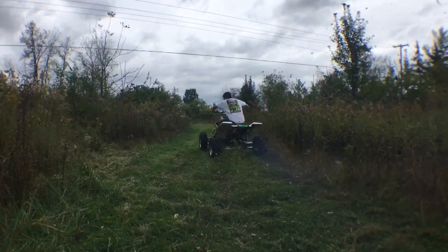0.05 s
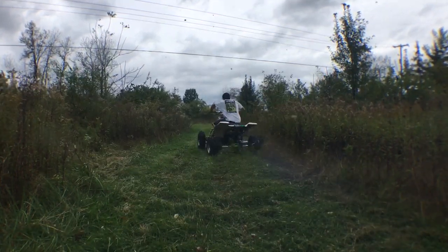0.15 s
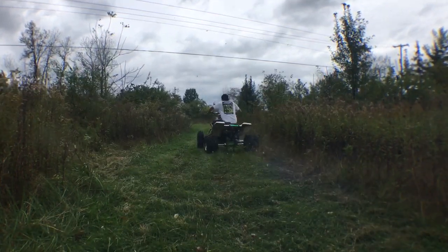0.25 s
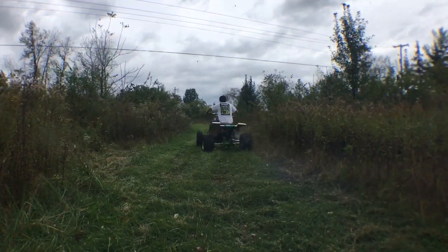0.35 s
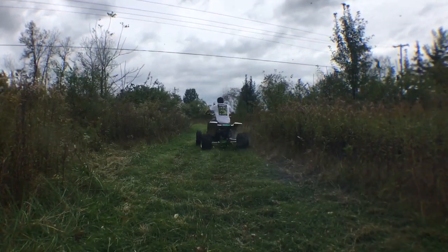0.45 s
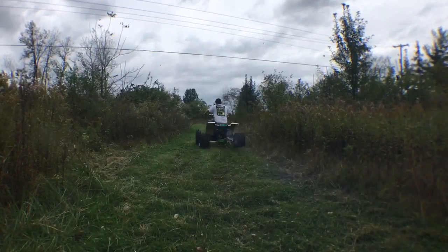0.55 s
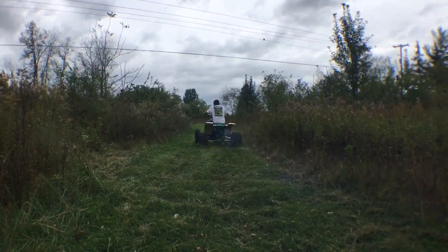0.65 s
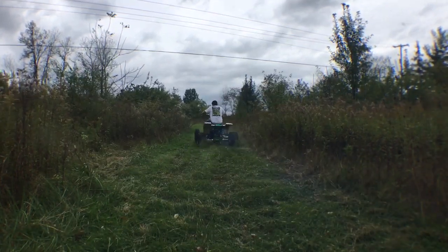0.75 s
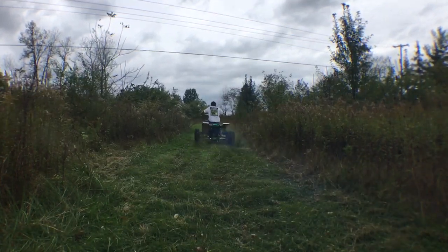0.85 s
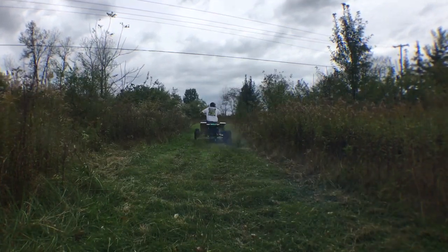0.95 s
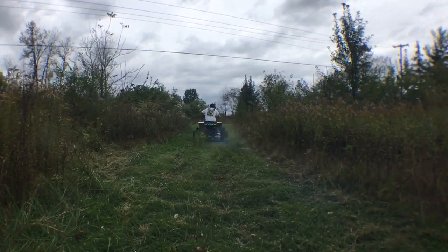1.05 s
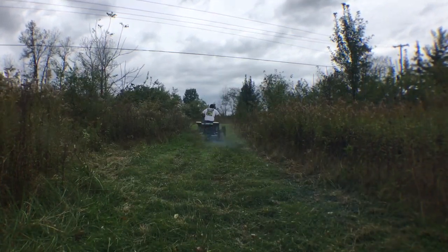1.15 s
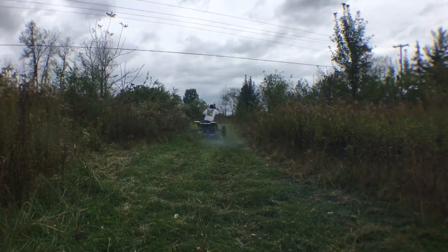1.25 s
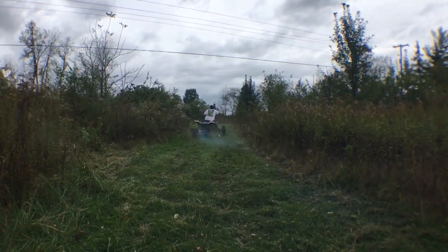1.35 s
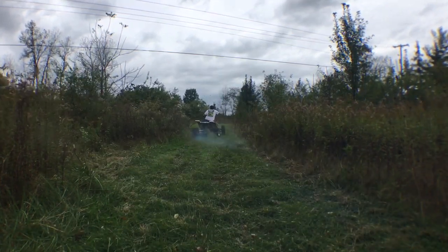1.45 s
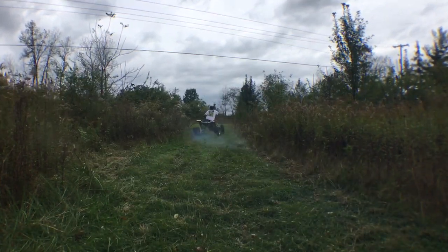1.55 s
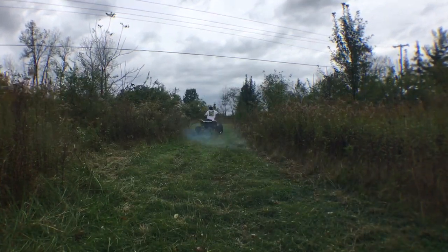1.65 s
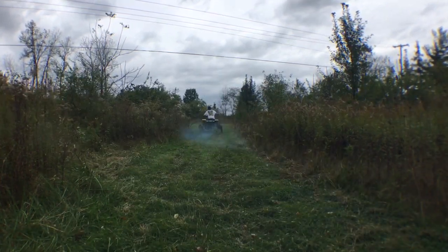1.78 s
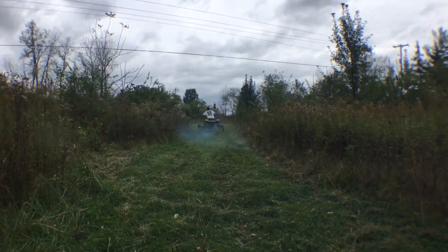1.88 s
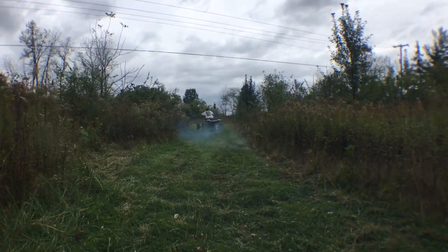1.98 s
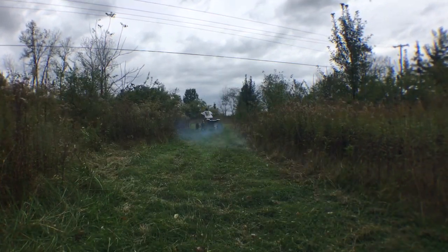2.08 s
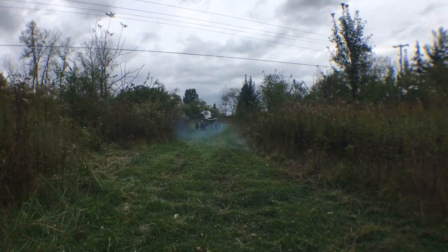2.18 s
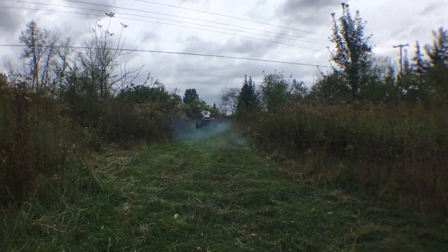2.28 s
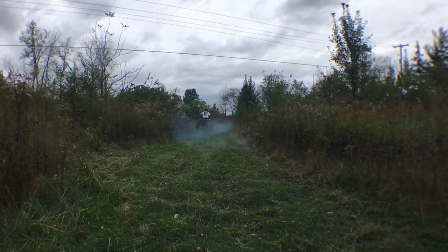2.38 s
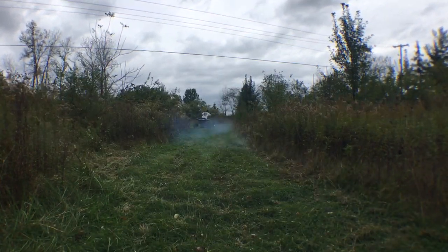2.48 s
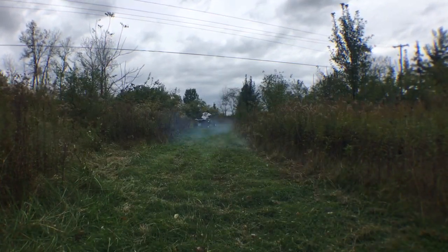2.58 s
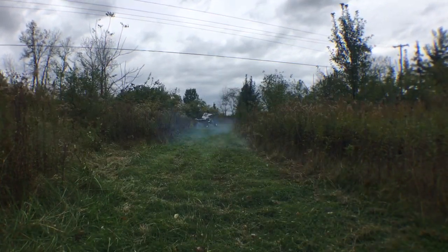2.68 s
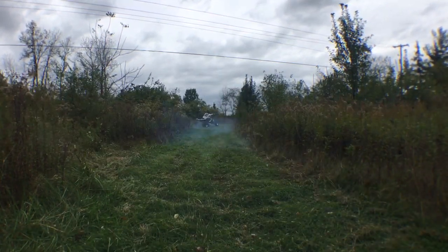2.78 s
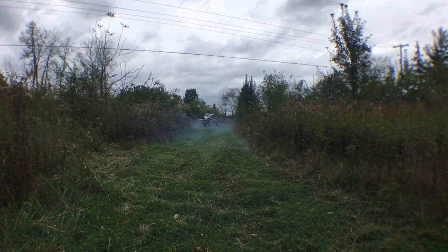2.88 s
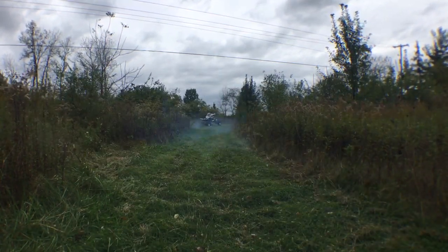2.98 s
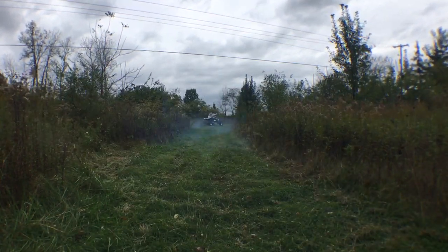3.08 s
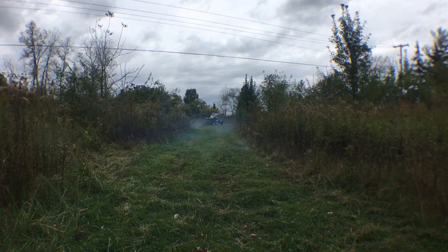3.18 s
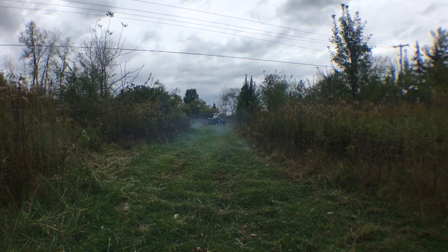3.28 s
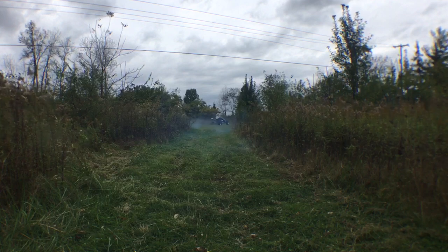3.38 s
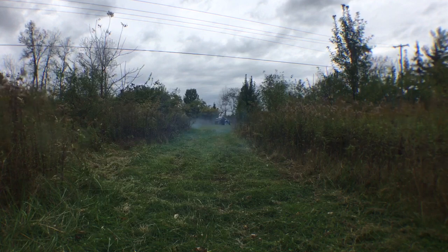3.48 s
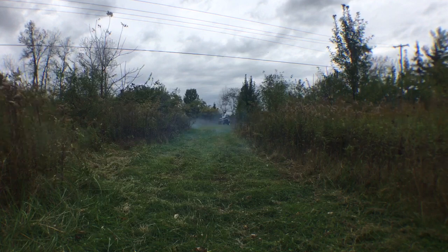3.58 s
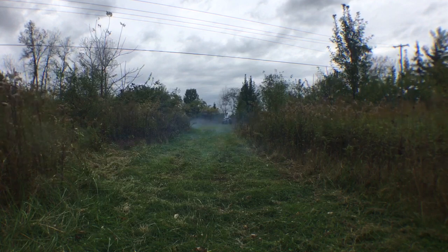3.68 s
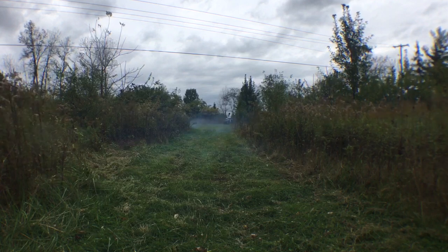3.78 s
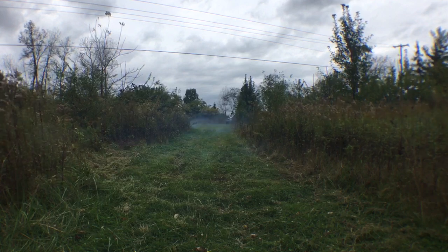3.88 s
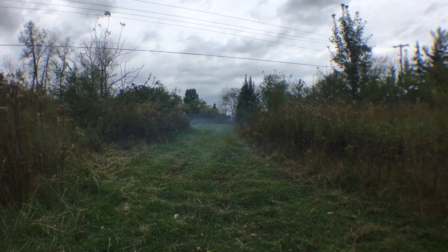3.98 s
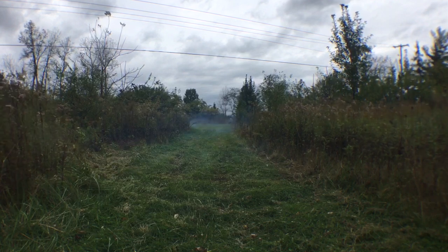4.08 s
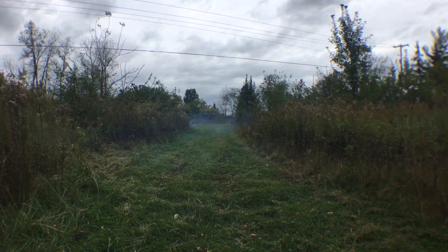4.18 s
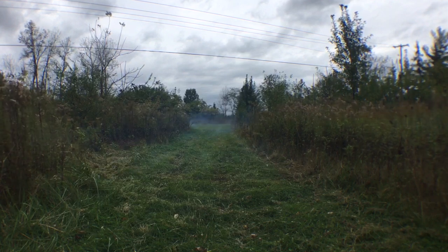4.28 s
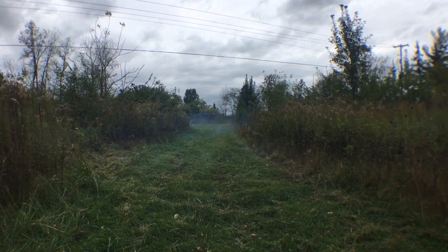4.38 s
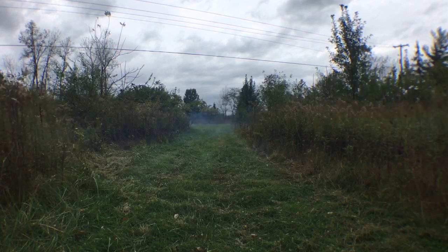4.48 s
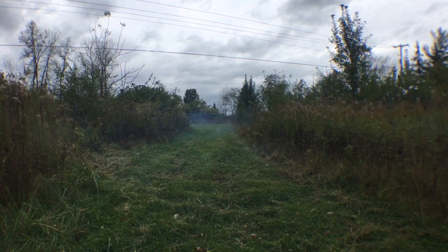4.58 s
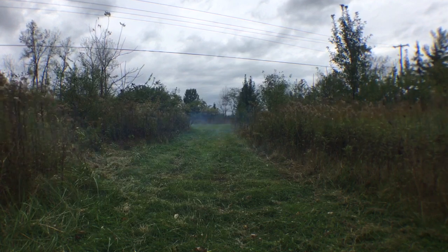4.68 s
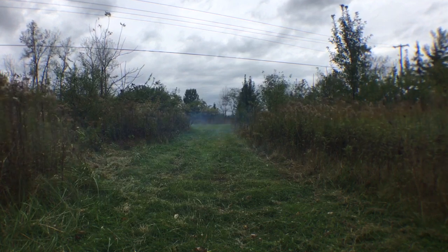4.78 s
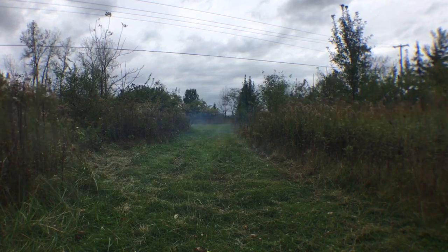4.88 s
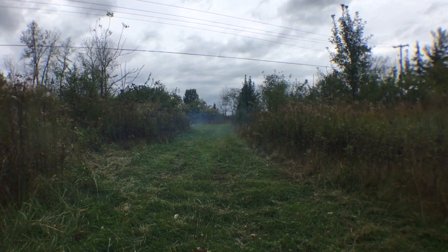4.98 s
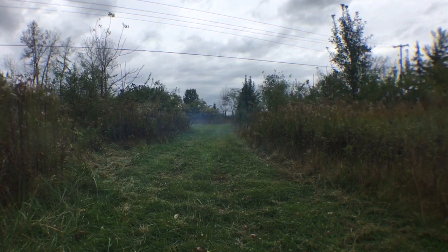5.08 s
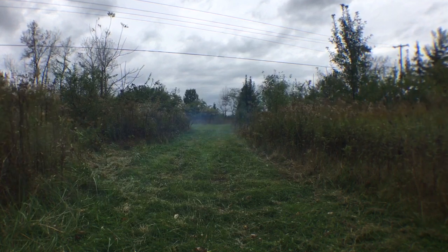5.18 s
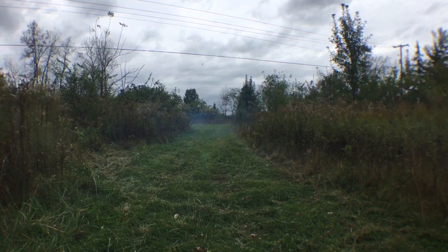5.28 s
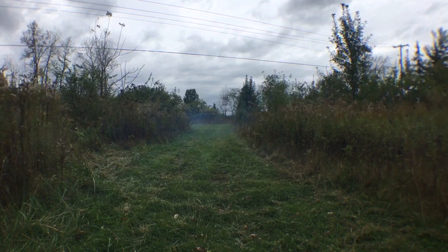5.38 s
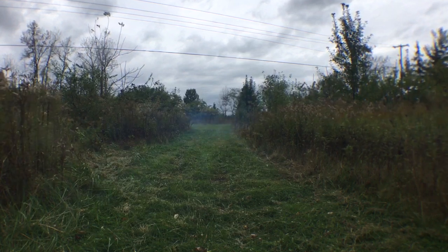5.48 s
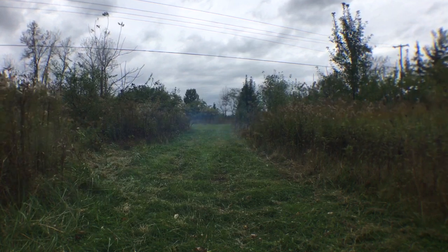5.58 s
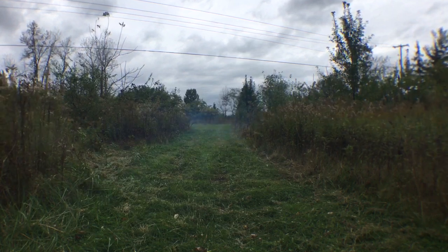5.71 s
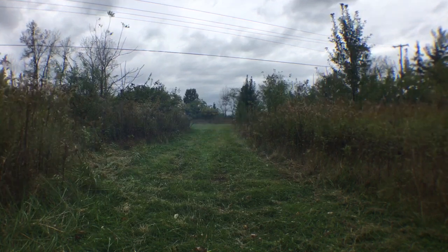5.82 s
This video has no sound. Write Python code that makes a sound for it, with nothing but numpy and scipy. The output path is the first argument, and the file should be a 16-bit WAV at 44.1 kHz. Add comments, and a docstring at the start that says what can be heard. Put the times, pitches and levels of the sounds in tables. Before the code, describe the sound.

One fixed microphone hears a two-stroke quad ahead: a short throttle-off sag with thin metal ringing, a sharp burst of gas and bark, then a sustained harsh buzzing pull with grassy hiss beneath. Its low body thins late in the pull before the throttle closes suddenly. Afterwards only a far, low engine drone remains with a quiet broad rush, small dry ticks and low wind thumps. Open air, mono, light scatter from bushes.

```python
"""Quad bike pulling away

A two-stroke quad with two cylinders goes down a grassy path: throttle shut, a hard pull, throttle shut again.
Each exhaust port cracks once a turn, as a click shaped by its pipe with gas noise after it; bushes scatter it.
Behind it, shaped noise makes a far engine's drone, a road's rush and grass hiss, with a wavering low note.
Small ticks are dying tones with noise, and wind bumps the one microphone as short low swells."""
import sys
import numpy as np
from scipy import signal
from scipy.fft import rfft, irfft, next_fast_len
from scipy.io import wavfile
from scipy.ndimage import uniform_filter1d, minimum_filter1d, map_coordinates

SR = 44100
rng = np.random.default_rng(int(sys.argv[2]) if len(sys.argv) > 2 else 0)


def persist_wave(psi):
    """Save psi, clipped to +-1, as 16-bit WAV."""
    counts = np.round(np.clip(psi, -1, 1) * 32767).astype(np.int16)
    wavfile.write(sys.argv[1], SR, np.atleast_2d(counts).T)


N = 257984  # length in samples


def amp(db):
    """Turn decibels into a gain."""
    return 10 ** (np.asarray(db) / 20)


def unit(x):
    """Scale a sound to rms 1."""
    return x / np.sqrt(np.mean(x ** 2) + 1e-20)


def seconds():
    """The time of every sample."""
    return np.arange(N) / SR


def along(points, hz):
    """Read a table of (frequency [Hz], value) on a log frequency axis."""
    f, value = np.transpose(points)
    return np.interp(np.log(hz + 1), np.log(f + 1), value)


def curves(rows):
    """Draw straight lines between rows: one curve over time for each column after the time."""
    s, *columns = np.transpose(rows)
    return [np.interp(seconds(), s, column) for column in columns]


def wobble(rate):
    """A smooth random curve with `rate` random points a second."""
    knots = rng.standard_normal(int(N * rate / SR) + 4)
    return map_coordinates(knots, [np.arange(N) * rate / SR])


def late(x, ms):
    """Delay a signal by a fixed or changing number of milliseconds."""
    return np.interp(np.arange(N) - ms * SR / 1000, np.arange(N), x)


def filtered(x, response):
    """Multiply the spectrum of x by a response, given as a function of frequency."""
    m = 2 * next_fast_len(N // 2 + SR // 4)
    return irfft(rfft(x, m) * response(np.fft.rfftfreq(m, 1 / SR)), m)[..., :N]


def coloured(spectrum):
    """The gain given by a table of (frequency [Hz], level [dB])."""
    return lambda hz: amp(along(spectrum, hz))


def narrow(lines):
    """The gain of several narrow peaks, each with a centre [Hz], width [Hz] and level [dB]."""
    def gain(hz):
        power = sum(amp(2 * db) / (1 + (2 * (hz - centre) / width) ** 2) ** 2 for centre, width, db in lines)
        return np.sqrt(power)
    return gain


def causal(spectrum):
    """The minimum-phase filter with this spectrum: it never sounds before its input."""
    def response(hz):
        cepstrum = irfft(np.log(amp(np.maximum(along(spectrum, hz), -70))))
        # fold the second half of the cepstrum onto the first
        cepstrum[1:len(hz) - 1] *= 2
        cepstrum[len(hz):] = 0
        return np.exp(rfft(cepstrum))
    return response


def rush(gain, patchy_db):
    """Coloured noise of rms 1, louder and softer in random patches of time and frequency."""
    z = signal.stft(rng.standard_normal(N), nperseg=512)[2]
    field = uniform_filter1d(rng.standard_normal(z.shape), size=6, axis=0)
    field = uniform_filter1d(field, size=12, axis=1)
    patchy = signal.istft(z * amp(patchy_db * unit(field)), nperseg=512)[1][:N]
    return unit(filtered(patchy, gain))


def low_note(level_db):
    """A low sine near 62 Hz that wavers in pitch and strength."""
    hz = 62 + 2.175 * wobble(7.6)
    level = amp(level_db + 0.87 * wobble(8.3))
    return np.sqrt(2) * level * np.sin(2 * np.pi * np.cumsum(hz) / SR)


# how loud the background layers are:
# (time [s], drone level [dB], road level [dB], low note level [dB], grass hiss level [dB])
BACKGROUND_LEVELS = [(0, -49, -39.5, -61, -34.5), (.56, -38.5, -34.5, -48, -33.5),
                     (.64, -36, -26, -56, -23), (.85, -37, -36, -55, -25), (1.8, -38, -42, -52, -28.5),
                     (2.9, -32.5, -42, -38, -27.5), (3.35, -34.5, -44.5, -40, -30.5),
                     (3.55, -31, -34, -27.5, -39), (3.75, -26.5, -28, -24.5, -42.5),
                     (4.2, -25, -28.5, -29, -42), (4.55, -31.5, -27.5, -31, -42.5),
                     (5.15, -28, -29.5, -28, -44), (5.85, -30, -27, -42, -44)]
# tone colour of the far engine's rumble: (frequency [Hz], level per Hz [dB])
RUMBLE_COLOUR = [(12, -60), (25, -42), (38, -23), (50, -26), (65, -7), (113, -12), (200, -16.5),
                 (350, -18.5), (420, -44), (900, -120)]
# wavering lines of the far engine: (frequency [Hz], width [Hz], level [dB])
FAR_ENGINE_LINES = [(59.9, 4.1, -6), (86.1, 3.4, -4.5), (138.5, 2.9, -5), (177.5, 1.6, -9),
                    (482.6, 6.4, -24)]
# tone colour of the distant road: (frequency [Hz], level per Hz [dB])
ROAD_COLOUR = [(180, 6), (300, -6), (388, -7), (472, -5.5), (585, -7.5), (757, 0), (1050, 2.5), (1550, -1),
               (2440, -12.5), (3500, -24.5), (4550, -37), (7700, -120)]
# tone colour of the grass hiss: (frequency [Hz], level per Hz [dB])
HISS_COLOUR = [(1200, -19), (2000, -9.5), (3200, -8.5), (5200, -8), (6250, -22.5), (7000, -32.5),
               (14300, -36.5), (16000, -40)]


def background():
    """Narrow bands of noise waver over rumble as a far engine; wide noise makes road and hiss."""
    drone_db, road_db, note_db, hiss_db = curves(BACKGROUND_LEVELS)
    lines = rush(narrow(FAR_ENGINE_LINES), patchy_db=2)
    rumble = rush(coloured(RUMBLE_COLOUR), patchy_db=2.5)
    drone = unit(lines + amp(-4.5) * rumble)
    road = amp(0.62 * wobble(6.5)) * rush(coloured(ROAD_COLOUR), patchy_db=0.5)
    hiss = rush(coloured(HISS_COLOUR), patchy_db=1.7)
    return amp(drone_db) * drone + amp(road_db) * road + amp(hiss_db) * hiss + low_note(note_db)


# small dry ticks, with the level before colouring: (time [s], level [dB], frequency [Hz])
TICKS = [(4.0568, -27, 2550), (4.166, -25.5, 3780), (4.2768, -24, 4650), (4.4913, -29, 4670),
         (4.6215, -31, 4600), (4.7153, -37, 4650), (4.7976, -31, 2630), (4.9238, -28, 3860),
         (5.1259, -35, 2570), (5.5624, -35, 2740), (5.6532, -33, 2750)]
# tone colour of the ticks: (frequency [Hz], level [dB])
TICK_COLOUR = [(1000, -16), (2500, -4.5), (5500, 1), (7000, -31), (16000, -28)]


def ticks():
    """Each tick is a tone with noise that dies away by 60 dB in 18 ms."""
    out, t = np.zeros(N + SR), np.arange(SR // 10) / SR
    for s, db, hz in TICKS:
        tone = 0.44 * np.sin(2 * np.pi * hz * t)
        noise = 1.5 * rng.standard_normal(len(t))
        out[round(s * SR):][:len(t)] += amp(db - 60 * t / 0.018) * (tone + noise)
    return filtered(out[:N], causal(TICK_COLOUR))


# wind on the microphone: (time [s], level [dB], frequency [Hz], length [s])
WIND_BUMPS = [(4.997, -11, 82, 0.028), (5.034, -11, 56, 0.0245), (5.522, -10.5, 62.3, 0.015)]


def wind_bumps():
    """Each bump is a low sine that swells and fades once."""
    out, t = np.zeros(N + SR), np.arange(SR // 10) / SR
    for s, db, hz, length in WIND_BUMPS:
        swell = np.sin(np.pi * np.clip(t / length, 0, 1))
        out[round(s * SR):][:len(t)] += amp(db) * swell * np.sin(2 * np.pi * hz * t)
    return out[:N]


# how long the bushes scatter sound: (frequency [Hz], time to fall by 60 dB [s])
BUSH_DECAY = [(300, 0.68), (2000, 0.57), (6000, 0.65), (12000, 0.07)]


def bushes(x):
    """Leaves scatter sound as a noisy tail in which each frequency dies at its own speed."""
    hz, t, z = signal.stft(rng.standard_normal(SR // 2), SR, nperseg=256)
    decay = amp(-60 * t / along(BUSH_DECAY, hz)[:, None])
    tail = signal.istft(z * decay, SR, nperseg=256)[1]
    return signal.fftconvolve(x, tail / np.linalg.norm(tail))[:N]


# how loud the casing rings: (time [s], level [dB])
CASING_LEVEL = [(0, -62), (.1, -46), (.4, -37.5), (.58, -34), (.66, -62), (1, -90)]
# metal ringing of the coasting engine: (frequency [Hz], width [Hz], level [dB])
CASING_RINGS = [(1670, 69, -1), (2050, 55, -15), (3180, 80, -2), (4460, 110, -2), (6170, 41, -6)]


def casing():
    """Metal rings at a few pitches, made as patchy noise in narrow bands."""
    return amp(curves(CASING_LEVEL)[0]) * rush(narrow(CASING_RINGS), patchy_db=4.0)


# when the throttle is open: (opening time [s], shutting time [s])
THROTTLE = [(-1, 0.07), (0.61, 3.39)]
OPEN_S, SHUT_S = 0.0034, 0.021  # how long opening and shutting take


def throttle():
    """How far the throttle is open (0-1), and the seconds since it last opened."""
    t = seconds()
    wide = 0
    for opens, shuts in THROTTLE:
        wide = wide + np.clip((t - opens) / OPEN_S, 0, 1) * np.clip(1 - (t - shuts) / SHUT_S, 0, 1)
    since = np.min([np.where(t >= opens, t - opens, np.inf) for opens, _ in THROTTLE], axis=0)
    return wide, since


# speed of the crankshaft: (time [s], speed [turns per s])
CRANK_SPEED = [(0.0, 170.7), (0.07, 167.5), (0.18, 144.4), (0.26, 135.0), (0.58, 104.8), (0.63, 114.5),
               (0.68, 140.4), (0.735, 121.8), (0.76, 117.0), (0.78, 120.5), (0.85, 140.6), (0.92, 155.0),
               (0.96, 161.3), (1.04, 167.0), (1.4, 165.0), (1.45, 160.4), (1.53, 158.1), (1.68, 164.8),
               (1.975, 167.9), (2.145, 155.5), (2.29, 151.8), (2.36, 159.0), (2.445, 158.4), (2.53, 156),
               (2.615, 143.6), (2.655, 151.8), (2.82, 157), (2.94, 159.5), (3.04, 166), (3.435, 167.0)]
# wheel hop makes the speed flutter: (start [s], end [s], hops per second [1/s], depth [turns per s])
WHEEL_HOPS = [(2.14, 2.3, 15.5, 1.5), (2.47, 2.57, 14, 1.5), (2.715, 2.96, 16.5, 1.2),
              (3.015, 3.21, 10.3, 2.4), (3.21, 3.4, 10.3, 1.4)]


def crank_turns():
    """Add up the crankshaft speed, with its flutter and small wander, into turns so far."""
    t = seconds()
    speed = curves(CRANK_SPEED)[0] + 0.5994 * wobble(16)
    for start, end, rate, depth in WHEEL_HOPS:
        speed += depth * ((t > start) & (t < end)) * np.sin(2 * np.pi * rate * (t - start))
    return np.cumsum(speed) / SR


# exhaust under power: (time [s], body level [dB], bark level [dB], rasp level [dB],
# sizzle level [dB], treble level [dB], firing tone level [dB])
POWER_LEVELS = [(0.0, -28, -20, -27, -20.5, -36, -22), (0.07, -27, -21.5, -29, -21.5, -41, -22),
                (0.63, -28, -23.5, -27, -19.5, -41, -23), (0.67, -26, -13, -28, -18, -38, -17),
                (0.71, -30, -20, -27, -21.5, -38, -18), (0.76, -29, -26.5, -31, -18, -40, -25),
                (0.83, -27, -21, -22.5, -19.5, -39, -15.5), (0.93, -18.5, -16, -23, -15, -35, -14.5),
                (1.09, -27, -19.5, -27, -18.5, -40, -18), (1.3, -23.5, -17.5, -37, -16.5, -39.5, -16),
                (1.35, -28.5, -21.5, -22, -23.5, -41, -19), (1.48, -27.5, -21.5, -21, -14, -37, -19),
                (1.51, -27, -24, -24, -20, -42, -22), (1.55, -26, -20, -23, -17.5, -40, -17.5),
                (1.67, -25, -20.5, -16.5, -19, -38, -20), (1.9, -28, -21, -35.5, -24, -42.5, -21),
                (1.99, -30, -21.5, -26, -23, -41, -21.5), (2.16, -28, -22.5, -22, -14, -37.5, -21.5),
                (2.21, -28, -25.5, -21, -16.5, -41.5, -21), (2.39, -29.5, -20.5, -21, -17.5, -42, -25),
                (2.45, -30.5, -24, -29, -28.5, -48, -27.5), (2.53, -29.5, -22, -33, -23.5, -45, -27),
                (2.64, -34.5, -25.5, -33, -30.5, -39, -27), (2.7, -34.5, -23.5, -24.5, -16.5, -38.5, -26),
                (2.93, -33.5, -21, -15.5, -22, -37.5, -26.5),
                (3.04, -35.5, -20, -18.5, -18.5, -35.5, -26.5), (3.24, -37, -20, -22, -21, -41, -26),
                (3.37, -37.5, -27.5, -27.5, -24.5, -45, -27)]
# throttle shut, one level [dB] each for: body, bark, rasp, sizzle, treble, firing tone, octave above it
COAST_LEVELS = [-45, -43.5, -52, -41, -55, -36.5, -47.5]
OCTAVE_DB, OCTAVE_FADE_DB_PER_S = -9, -4  # octave against the firing tone
OCTAVE_SWING = 1.02  # adds this many times the firing tone's quick level changes to the octave
TURBULENCE, SURGE, SURGE_S = 0.04, 0.45, 0.1  # share of gas noise; extra after opening, and its fade


def levels():
    """An open throttle swaps coasting levels for power levels and adds a surge of gas noise."""
    t, (wide, since) = seconds(), throttle()
    *bands, tone = curves(POWER_LEVELS)
    swing = tone - uniform_filter1d(tone, size=SR // 4)
    octave = tone + OCTAVE_DB + OCTAVE_FADE_DB_PER_S * t + OCTAVE_SWING * swing
    # far off, the idle is lost after the last shut
    stopped = -25 * np.clip((t - THROTTLE[-1][1]) / SHUT_S, 0, 1)
    db = []
    for on, coast in zip([*bands, tone, octave], COAST_LEVELS):
        pulling = wide * (on + 1.1 * wobble(14) - coast)
        shut = (1 - wide) * (2 * wobble(17.7) + stopped)
        db.append(coast + pulling + shut)
    gas_share = TURBULENCE * amp(4.9 * wobble(12)) + SURGE * np.exp(-since / SURGE_S)
    return db[:5], db[5], db[6], gas_share


def firings(turns, jitter, scatter_db):
    """One click each whole turn, of random size and timing, placed between samples."""
    whole = np.arange(1, int(turns[-1]))
    chance = rng.standard_normal((len(whole), 2))
    early_late = np.interp(whole, turns, jitter * np.ones(N)) * chance[:, 0]
    at = np.interp(whole + early_late, turns, np.arange(N))
    # a short windowed sinc draws each click
    taps = np.floor(at)[:, None] + np.arange(-8, 9)
    offset = taps - at[:, None]
    shape = np.sinc(offset) * np.cos(np.pi * offset / 18) ** 2
    size = amp(scatter_db * chance[:, 1])[:, None]
    return np.bincount(np.clip(taps, 0, N - 1).astype(int).ravel(), (shape * size).ravel(), N)


# the quad sways, so the second pipe's crack changes; level is against the first pipe, before the
# band differences below: (time [s], level [dB], unsteadiness [turns])
SECOND_PIPE = [(0, 1.5, .0015), (.62, 4, 0.0026), (1.0, -5, .0015), (1.4, 0.5, 0.0022), (1.5, -8, 0.0047),
               (1.65, 4.5, 0.0023), (1.95, -0.5, 0.0013), (2.1, -6.5, 0.0078), (2.55, -3.5, 0.015),
               (2.9, -13, 0.0094), (3.0, -4.5, 0.0011), (3.44, 0, 0.0013)]
# extra path of the second pipe, as a lag behind the half turn: (time [s], lag [ms])
SECOND_LAG = [(0, 0.25), (.62, -0.019), (.84, -0.059), (1.07, -0.078), (1.3, -0.004), (1.335, 0.29),
              (1.4, 0.15), (1.45, 0.48), (1.5, 0.042), (1.62, 0.35), (1.75, 0.11), (2.0, -0.072),
              (2.25, -0.17), (2.5, 0.0091), (2.63, 0.32), (2.92, 0.73), (2.98, 0.67), (3.14, 0.68),
              (3.44, .76)]
GROUND_DB, GROUND_MS = -19.5, 0.557  # each crack is heard again off the ground


def cracks(turns, lag_ms):
    """Two ports crack half a turn apart, unequally, and each crack comes again off the ground."""
    second_db, unsteady = curves(SECOND_PIPE)
    first = firings(turns, jitter=0.00039, scatter_db=1.13)
    second = firings(late(turns, lag_ms) + .5, jitter=np.abs(unsteady), scatter_db=1.74)
    second = amp(second_db) * second
    return [x + amp(GROUND_DB) * late(x, GROUND_MS) for x in (first, second)]


def gas_flow(turns, lag_ms):
    """Turbulent gas is noise that bursts at each port opening and dies away within the turn."""
    def after(behind):
        return np.exp(-((turns - behind) % 1) / 0.29)
    lag_turns = lag_ms * np.gradient(turns) * SR / 1000
    return (0.31 + after(0) + 0.36 * after(.5 + lag_turns)) * rng.standard_normal(N)


# unequal cylinders add odd multiples: (multiple of the crank speed [1], level against the bark [dB])
ODD_ORDERS = [(1, -25), (3, -26), (5, -32.5)]


def firing_tones(turns, tone_db, octave_db, bark_db):
    """Two firings a turn make a steady tone, its octave, and weaker odd multiples of the crank speed."""
    phase = 2 * np.pi * turns
    tones = amp(tone_db) * np.sin(2 * phase + .3)
    tones += amp(octave_db + 1.2 * wobble(30)) * np.sin(4 * phase)
    for order, db in ODD_ORDERS:
        tones += amp(bark_db + db + 1.2 * wobble(6.6)) * np.sin(round(order) * phase)
    return np.sqrt(2) * tones


# tone colour of the exhaust pipes: (frequency [Hz], level per Hz [dB])
PIPE_COLOUR = [(200, -20), (450, -55), (700, -11), (1000, 0.5), (1400, 2.5), (2500, 4.5), (5200, 1.5),
               (6000, -7.5), (7300, -28), (14600, -19.5), (16000, -21)]
# edges of the five bands body, bark, rasp, sizzle and treble: (frequency [Hz])
BAND_EDGES = [400, 1200, 2200, 3600, 7200, 17000]
MISFIRE_S, MISFIRE_LENGTH_S, MISFIRE_DB = 1.504, 0.005, -11.5  # the engine stumbles once


def engine():
    """Port cracks and gas noise pass through the pipes in five bands, with firing tones added."""
    band_db, tone_db, octave_db, gas_share = levels()
    lag_ms, = curves(SECOND_LAG)
    turns = crank_turns()
    first, second = cracks(turns, lag_ms)
    gas = gas_flow(turns, lag_ms)
    airy = [.2, .4, .8, 3.5, 14]  # higher bands hold more turbulence
    second_band_db = [-2.5, 2.5, -5.0, -3.0, 9.0]  # the second pipe's crack has its own tone colour
    out = np.zeros(N)
    for lo, hi, db, air, second_db in zip(BAND_EDGES, BAND_EDGES[1:], band_db, airy, second_band_db):
        def band(hz):
            split = 1 / (1 + (hz / hi) ** 8) - 1 / (1 + (hz / lo) ** 8)
            return 1j * amp(along(PIPE_COLOUR, hz)) * split  # 1j makes each crack an N-shaped pressure jump
        parts = filtered([-first - amp(second_db) * second, gas], band)
        # even out the loudness, so that the level tables set it
        parts /= np.sqrt(np.abs(uniform_filter1d(parts ** 2, size=2400, axis=1)) + 1e-12)
        mix = np.clip(gas_share * air, 0, 1)
        out += amp(db) * (np.sqrt(1 - mix) * parts[0] + np.sqrt(mix) * parts[1])
    out *= amp(MISFIRE_DB * np.exp(-((seconds() - MISFIRE_S) / MISFIRE_LENGTH_S) ** 2))
    running = np.arange(N) < CRANK_SPEED[-1][0] * SR
    return running * (out + firing_tones(turns, tone_db, octave_db, band_db[1]))


def scene():
    """Everything reaches one microphone, so both channels are the same."""
    quad = engine() + casing()
    mono = quad + amp(-17.5) * bushes(quad) + background() + ticks() + wind_bumps()
    return np.array([mono, mono])


def record(dry):
    """A fast limiter holds the peaks; then bass is cut below 33 Hz and all above 15750 Hz is removed."""
    need = np.minimum(1, .97 / (np.abs(dry) + 1e-9))
    gain = uniform_filter1d(minimum_filter1d(need, size=61, axis=1), size=31, axis=1)
    return filtered(dry * gain, lambda hz: (hz < 15750) * hz ** 4 / (hz ** 4 + 33. ** 4))


dry = scene()
out = record(dry)
persist_wave(out)
```